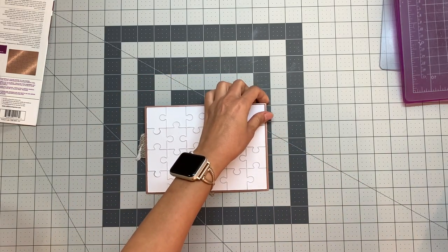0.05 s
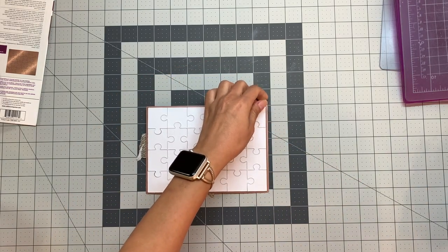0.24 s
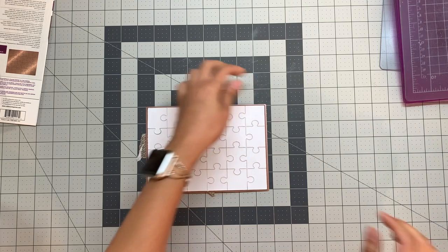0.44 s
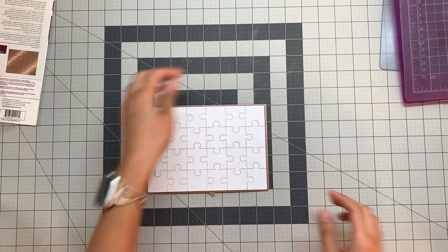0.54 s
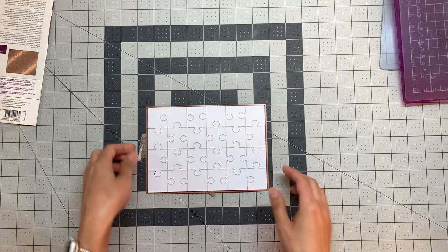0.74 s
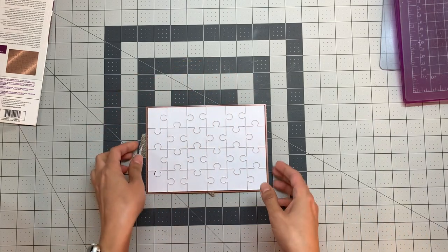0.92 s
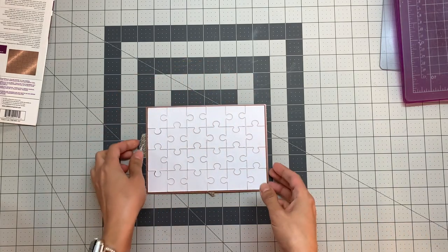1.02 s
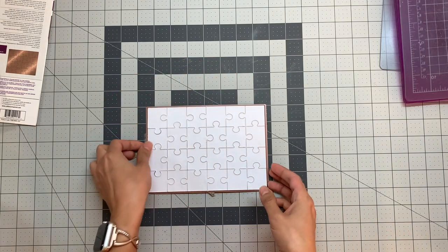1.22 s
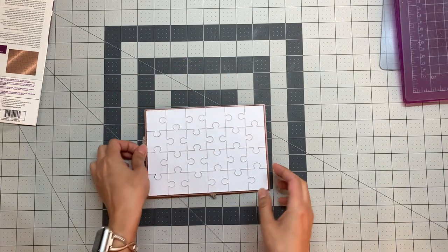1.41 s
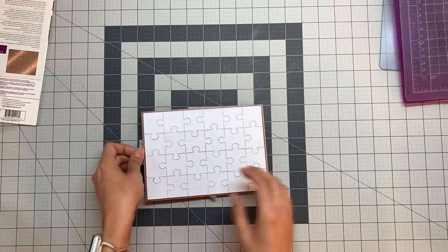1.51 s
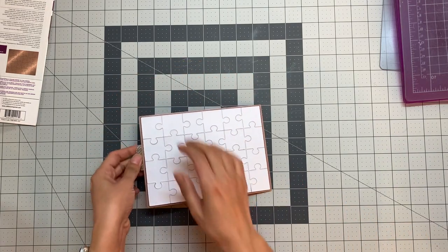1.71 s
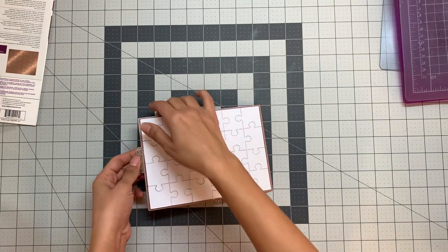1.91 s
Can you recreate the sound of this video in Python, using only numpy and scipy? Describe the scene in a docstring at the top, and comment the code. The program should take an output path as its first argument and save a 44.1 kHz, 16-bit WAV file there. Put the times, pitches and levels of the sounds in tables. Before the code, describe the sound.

A loud card slap on a cutting mat, bouncing briefly, followed by quiet taps, scuffs and slides

```python
"""A stiff card sheet on a backing plate slaps down on a cutting mat close to a small microphone, and bounces:
each knock is gritty noise ringing the plate's modes, with a clatter of loose pieces and a boom of the table.
Before, between and after the knocks, fingers tap (pushes with table ring), tick (short sine rings with a
noise snap), scuff, drag and slide (filtered noise). The contacts also come back from the room as a decaying
tail, over steady room noise and a low rumble.
"""
import sys
import numpy as np
from scipy import signal
from scipy.fft import rfft, irfft
from scipy.io import wavfile

SR = 44100
rng = np.random.default_rng(int(sys.argv[2]) if len(sys.argv) > 2 else 0)


def wrap_up_sound(samples):
    """Save the sound to the file named by the first command line argument, as 16-bit audio."""
    columns = np.atleast_2d(samples).T
    # keep every value between -1 and 1, then stretch to whole-number steps
    tamed = np.clip(columns, -1, 1)
    steps = np.round(tamed * 32767).astype(np.int16)
    wavfile.write(sys.argv[1], SR, steps)


def to_linear_factor(level_db):
    """Convert decibel levels (scalar or array-like) to linear amplitude factors."""
    exponent = np.asarray(level_db, float) / 20
    return 10 ** exponent


N = 85995  # samples, 1.95 s

# Ringing modes of the backing plate. Each row: frequency in Hz, relative level in dB, 60 dB decay time in seconds.
PLATE_MODES = [(1270, -2.5, 0.036), (1462, -8, 0.069), (1628, -0.5, 0.024), (1850, 2.5, 0.019),
               (2070, -2, 0.018), (2230, -4.5, 0.04), (2574, -5, 0.016), (2870, -9, 0.04)]
# Booming modes of the table. Each row: frequency in Hz, relative level in dB, 60 dB decay time in seconds.
TABLE_MODES = [(43.8, -1.5, 0.23), (80.8, -10, 0.3), (131.1, -6, 0.27), (187.4, -10.5, 0.21),
               (224.5, -10, .15), (303, -7.5, .12), (473, -9.5, 0.071), (581.3, -2, 0.083),
               (838, -13, 0.08)]
UNEVEN_DB = 2.5  # standard deviation of the mode levels from strike to strike


def evened(x):
    """Scales to rms 1."""
    return x / np.sqrt(np.mean(x ** 2) + 1e-20)


def read(points, hz):
    """Reads a spectrum or a set of decay times along a log frequency axis."""
    f, value = np.transpose(points)
    return np.interp(np.log(hz + 1), np.log(f + 1), value)


def curve(points):
    """Gain over time from rows of seconds and dB."""
    s, db = np.transpose(points)
    return to_linear_factor(np.interp(np.arange(N) / SR, s, db))


def add(mix, s, sound):
    """Adds a sound to the mix at time s, cut at the end of the mix."""
    part = mix[round(s * SR):][:len(sound)]
    part += sound[:len(part)]


def coloured(x, points, tilt_db=0):
    """Filters x by a spectrum, tilted by about tilt_db per octave, and scales it to rms 1."""
    hz = np.fft.rfftfreq(len(x), 1 / SR)
    tilt = tilt_db * np.log2(hz / 2000 + 0.14)  # the offset limits the tilt in the bass
    gain = to_linear_factor(read(points, hz) + tilt)
    return evened(irfft(rfft(x) * gain, len(x)))


def gritty(count, spread_db):
    """Noise whose samples vary widely in size, as from catching fibres."""
    boost_db = spread_db * np.minimum(rng.exponential(1, count), 4)
    return rng.standard_normal(count) * to_linear_factor(boost_db)


def ring(modes, seconds, spread_db):
    """Impulse response of a body struck at a chance place: decaying modes of uneven level and sign, peak 1."""
    t = np.arange(round(seconds * SR)) / SR
    luck = rng.standard_normal(len(modes))
    signs = rng.choice([-1., 1.], len(modes))
    x = np.zeros(len(t))
    for (hz, db, t60), u, sign in zip(modes, luck, signs):
        x += sign * to_linear_factor(db + spread_db * u - 60 * t / t60) * np.sin(2 * np.pi * hz * t)
    return x / abs(x).max()


def stroke(length):
    """Loudness of one hand stroke: quick rise, slower fall; at most 8192 samples (0.186 s) are kept."""
    progress = np.minimum(np.arange(8192) / SR / length, 1)
    return np.sin(np.pi * progress ** 0.55)


def background():
    """Steady room noise, and the lumpy low rumble of a table shaken by the arms."""
    # Room noise. Each row: frequency in Hz, relative density in dB per Hz.
    hum = [(11, -29), (18, 16.5), (47, -2.5), (683, -20.5), (2600, -40), (3260, -28), (4330, -44.5),
           (14300, -38), (16000, -44)]
    # Table rumble. Each row: time in seconds, rumble level in dB.
    rumble = [(0.0, -51.5), (0.362, -36), (0.498, -53.5), (1.096, -53), (1.726, -51.5), (1.95, -50)]
    rumble_tone = [(15, -33), (35, -2), (60, 0), (110, -20.5), (250, -52), (800, -67)]  # Hz, dB per Hz
    low = coloured(rng.standard_normal(N), rumble_tone)
    return to_linear_factor(-48) * coloured(rng.standard_normal(N), hum) + curve(rumble) * low


def room(x):
    """Room tail: sparse reflections of random sign, each band dying at its own speed."""
    # Room decay. Each row: frequency in Hz, 60 dB decay time in seconds.
    decay = [(100, 0.35), (400, 0.35), (1100, 0.17), (3000, 0.14), (8000, 0.19)]
    reflections = np.zeros(SR // 2)
    at = np.arange(200, SR // 2 - 20, 20)  # one in every 20 samples, after a gap of 200
    reflections[at + rng.integers(0, 20, len(at))] = rng.choice([-1., 1.], len(at))
    hz, t, z = signal.stft(reflections, SR, nperseg=256)
    fall = to_linear_factor(-60 * t / read(decay, hz)[:, None])
    tail = signal.istft(z * fall, SR, nperseg=256)[1]
    return signal.fftconvolve(x, tail / np.linalg.norm(tail))[:N]


def rubbing():
    """The palm drags over the sheet: gritty noise, heard directly and through the plate."""
    # Palm drag. Each row: time in seconds, level of the direct sound in dB.
    drag = [(0.0, -49), (0.156, -64.5), (0.308, -58), (0.738, -63), (0.874, -55.5), (1.02, -60.5),
            (1.232, -62.5), (1.368, -59.5), (1.644, -61.5), (1.84, -56), (1.95, -74)]
    # Tone of the direct sound. Each row: frequency in Hz, relative density in dB per Hz.
    drag_tone = [(88, -38), (150, -2), (1570, -26.5), (2140, -38.5), (3710, -25), (7050, -30.5),
                 (12000, -37), (15600, -45), (22000, -120)]
    grit = gritty(N, 2.9)
    plate = evened(signal.fftconvolve(grit, ring(PLATE_MODES, .2, 0))[:N])
    return curve(drag) * (coloured(grit, drag_tone) + to_linear_factor(-5.5) * plate)


def slide(length, db):
    """A fingertip slides on the smooth face: a narrow hiss under one stroke."""
    centre_hz, width_hz = 3180, 550
    band = [(centre_hz - 2 * width_hz, -30), (centre_hz - width_hz / 2, -4), (centre_hz, 0),
            (centre_hz + width_hz / 2, -4), (centre_hz + 2 * width_hz, -16), (16000, -30)]  # Hz, dB
    return to_linear_factor(db) * stroke(length) * coloured(gritty(8192, 6.4), band)


def scuff(length, db, tilt_db, plate_db):
    """A card edge scuffs over the mat: broad grit under one stroke, part of it through the plate."""
    # Tone of the grit before its tilt. Each row: frequency in Hz, relative density in dB per Hz.
    scuff_tone = [(500, -11), (1050, -11), (1330, -6), (1650, -11), (2500, -8.5), (4500, -10), (9000, -18),
                  (15500, -21.5)]
    grit = gritty(8192, 2.97)
    plate = signal.fftconvolve(grit, ring(PLATE_MODES, .2, UNEVEN_DB))
    plate = evened(plate[4096:12288])  # already ringing when the stroke starts
    return to_linear_factor(db) * stroke(length) * (coloured(grit, scuff_tone, tilt_db) + to_linear_factor(plate_db) * plate)


def tick(db, hz, t60, snap_db):
    """A nail or card edge ticks: one short sine ring with a noise snap in front."""
    t = np.arange(4096) / SR
    snap_t60 = 0.0034  # s
    snap = to_linear_factor(snap_db - 60 * t / snap_t60) * rng.standard_normal(4096)
    rise = np.minimum(t / 0.00031, 1)  # 0.31 ms
    tone = rise * to_linear_factor(-60 * t / t60) * np.sin(2 * np.pi * hz * t)
    return to_linear_factor(db) * (tone + snap)


def tap(db, half_push_ms):
    """A fingertip lands on the mat: the changing force of a soft push of skin, with the table ring."""
    push = np.hanning(max(round(half_push_ms * SR / 500), 8))  # up and down: twice half_push_ms
    out = to_linear_factor(-4.5) * ring(TABLE_MODES, .4, UNEVEN_DB)
    out[:len(push) - 1] += np.diff(push) / np.diff(push).max()
    return to_linear_factor(db) * out


def knock(db, clatter_db, thump_db, hard_db):
    """A sharp, rattling contact rings the plate, shakes the loose pieces and thumps the table."""
    # Loose pieces on the plate, before the tilt. Each row: frequency in Hz, relative density in dB per Hz.
    clatter_tone = [(300, -12.5), (1000, -9), (1500, -8), (2500, -2.5), (4500, -14.5), (6900, -8.5),
                    (10000, -16), (15500, -17.5)]
    contact_s, clatter_t60, crack_t60 = 0.0017, 0.072, 0.014  # s; the first is a 1/e decay time
    t = np.arange(4096) / SR
    contact = gritty(4096, 4.74) * np.exp(-t / contact_s)
    # A harder contact favours the higher modes
    modes = [(hz, level + hard_db * np.log2(hz / 1300), t60) for hz, level, t60 in PLATE_MODES]
    plate = signal.fftconvolve(contact, ring(modes, .4, UNEVEN_DB))[:round(.4 * SR)]
    out = plate / abs(plate).max() + to_linear_factor(thump_db) * ring(TABLE_MODES, .4, UNEVEN_DB)
    fall = to_linear_factor(-60 * t / clatter_t60) + to_linear_factor(-60 * t / crack_t60)  # rattle and a quicker crack
    clatter = fall * coloured(gritty(4096, 2.93), clatter_tone, hard_db)
    out[:4096] += to_linear_factor(clatter_db - 11.5) * clatter
    return to_linear_factor(db) * out


def scene():
    """All contacts close to the microphone, their room tail and the background."""
    # Finger slides. Each row: start in seconds, length in seconds, level in dB.
    slides = [(.37, 0.17, -66), (.53, 0.15, -65), (.78, 0.1, -72.5), (1.49, 0.15, -60), (1.58, 0.22, -63.5),
              (1.68, 0.12, -58.5), (1.75, 0.15, -56), (1.9, .08, -63.5)]
    # Card edge scuffs. Each row: start in seconds, length in seconds, level in dB,
    # treble tilt in dB per octave, plate level against the grit in dB.
    scuffs = [(0., 0.022, -63.5, -6, -18), (.17, 0.091, -59.5, -4.5, -2.5), (.748, 0.038, -47.5, -5, -8),
              (.85, 0.095, -65, -12, -7), (.912, 0.019, -46.5, -5.5, -9), (1.162, 0.026, -51.5, 3, -6),
              (1.186, 0.031, -48.5, -0.5, -9), (1.283, 0.042, -59, -1, 1), (1.32, 0.017, -50, -2.5, -13),
              (1.362, 0.072, -60.5, -2.5, 3.5), (1.41, 0.056, -50.5, -5, -6), (1.52, 0.05, -60, 2, -2),
              (1.555, 0.019, -43, 1, -13), (1.654, .018, -49, -1.5, -14), (1.78, 0.058, -63, -4.5, -10)]
    # Nail and card edge ticks. Each row: start in seconds, level in dB, pitch in Hz,
    # 60 dB decay time in seconds, snap level against the ring in dB.
    ticks = [(.0472, -43, 1285, .04, -25), (.2209, -39, 1272, 0.044, -20.5), (.5575, -54, 3370, .02, -14),
             (.7485, -48.5, 1300, 0.034, 4), (.914, -55, 1110, 0.014, -1), (1.06, -50, 2830, .015, -12.5),
             (1.1645, -42, 7000, .015, -8), (1.171, -48, 6300, 0.0093, -6), (1.241, -48, 1270, .02, -14),
             (1.301, -46, 1340, 0.049, -17), (1.321, -47, 2340, 0.01, 2), (1.421, -43.5, 1273, 0.046, -20),
             (1.4615, -31.5, 3460, 0.0095, -30), (1.5576, -37.5, 3700, 0.013, 7),
             (1.5625, -44, 2780, 0.015, 6), (1.657, -42, 2037, 0.023, -11),
             (1.695, -48.5, 3530, 0.012, -17), (1.8017, -40, 2990, 0.023, -17),
             (1.9454, -43.5, 3080, .015, -14)]
    # Fingertip taps. Each row: start in seconds, peak level of the push in dB, half the push length in ms.
    taps = [(0.747, -38, 0.8), (0.756, -33.5, 1.5), (0.862, -40, 2.7), (0.918, -38.5, 1.84),
            (0.923, -35, 2.14), (0.945, -43, 2.2), (1.424, -43.5, 2.04), (1.787, -41.5, 1.96)]
    # Plate meets mat. Each row: start in seconds, peak level of the plate in dB, clatter level in dB
    # (before a common cut), table thump against the plate in dB, hardness tilt in dB per octave.
    knocks = [(.2402, -8.5, 1, -10, -0.5), (.2448, -11, -2.5, -10, -8.5), (.2526, -15, -25, -4, -10),
              (.268, -22, 5.5, -25, -3), (.2765, -32.5, -9, -27, -20), (.2828, -17, 4, -9.5, -3),
              (.2878, -14.5, -4, -11, 1.5), (.2935, -17, -5.5, -2, -6), (.3137, -21, 0.5, -7, -5.5),
              (.3368, -30, -0.5, 2, -4.5), (.6735, -31.5, -3.5, -3.5, -4.5), (.6923, -33, -4, -18, -5),
              (1.5226, -37, -6.5, -15, -7), (1.5375, -45, -7, -21, -8)]
    near = rubbing()
    contacts = ((slides, slide), (scuffs, scuff), (ticks, tick), (taps, tap), (knocks, knock))
    for rows, source in contacts:
        for s, *settings in rows:
            add(near, s, source(*settings))
    return (near + to_linear_factor(-11) * room(near) + background())[None]


def low_pass(x):
    """Removes everything above the highest recorded frequency."""
    return signal.sosfilt(signal.butter(12, 16850, fs=SR, output="sos"), x)


def record(dry):
    """Takes the sound at the microphone with a steep low-pass at 15.9 kHz."""
    lowpass = signal.firwin(255, 15900, window=("kaiser", 9), fs=SR)
    mix = signal.oaconvolve(dry, lowpass[None], "same")
    return low_pass(mix)


dry = scene()
out = record(dry)
wrap_up_sound(out)
```